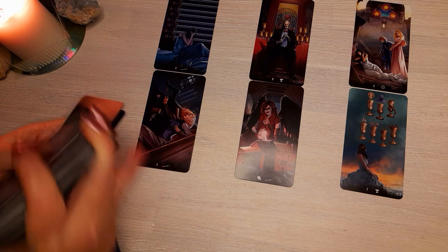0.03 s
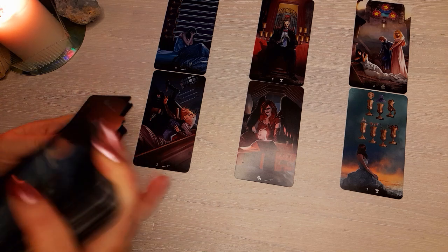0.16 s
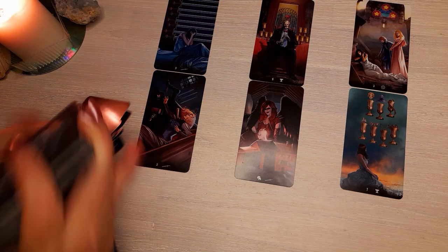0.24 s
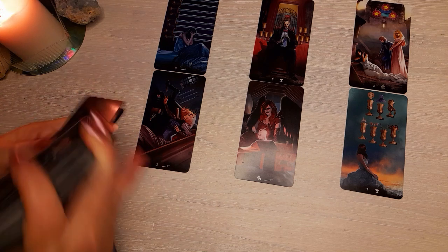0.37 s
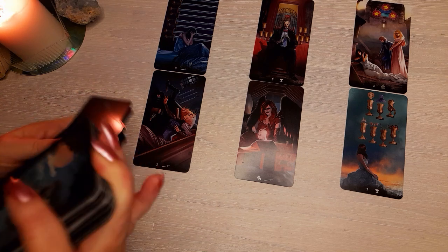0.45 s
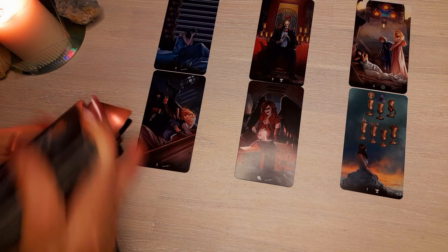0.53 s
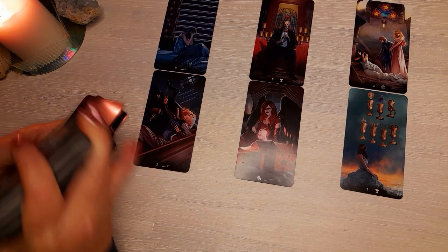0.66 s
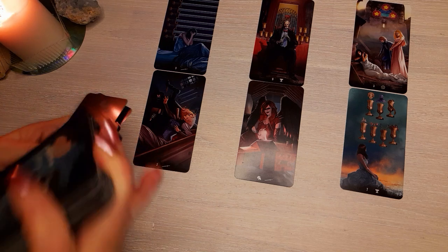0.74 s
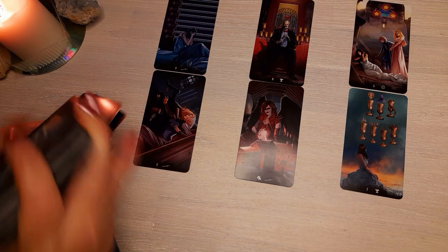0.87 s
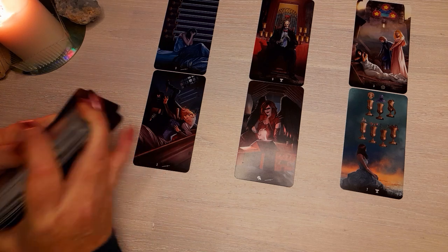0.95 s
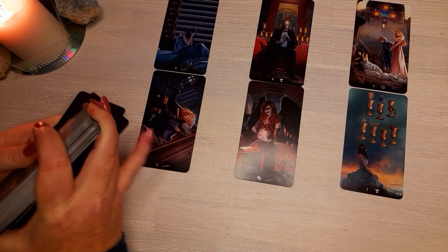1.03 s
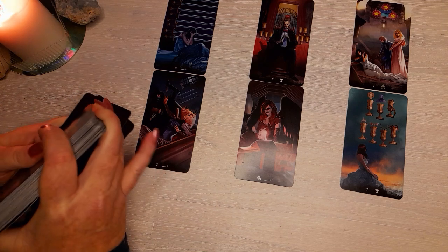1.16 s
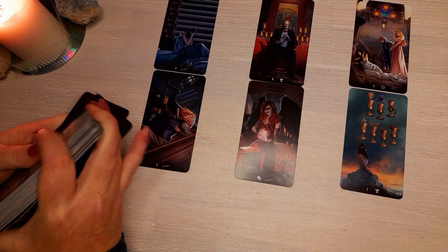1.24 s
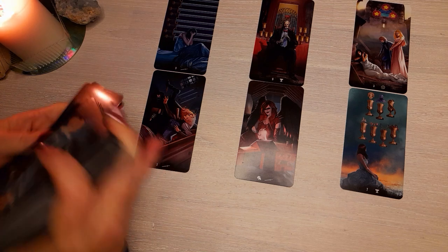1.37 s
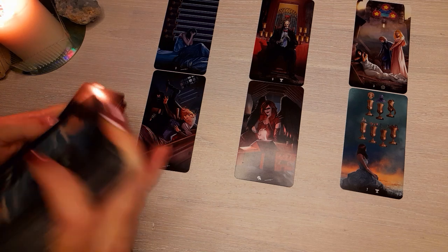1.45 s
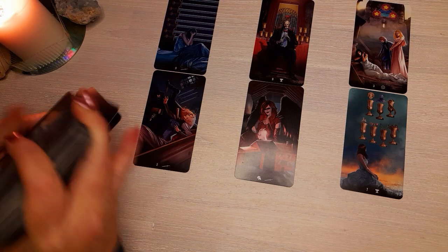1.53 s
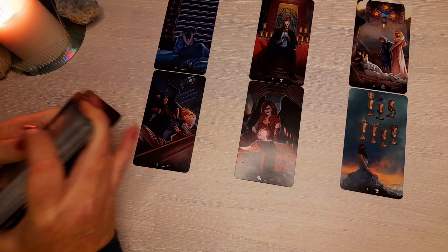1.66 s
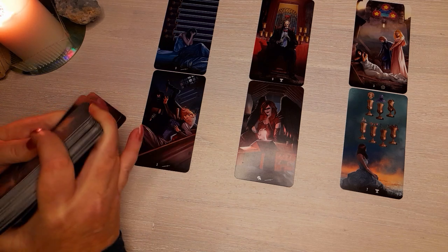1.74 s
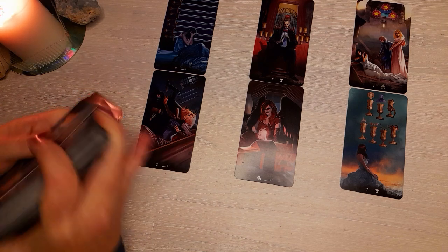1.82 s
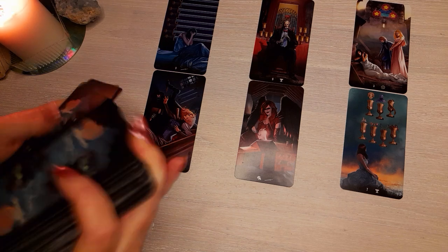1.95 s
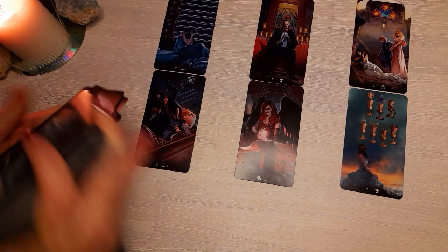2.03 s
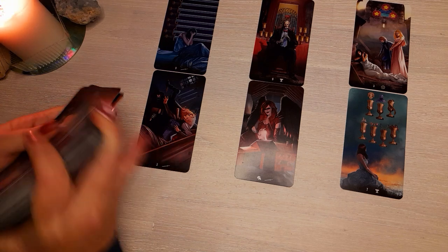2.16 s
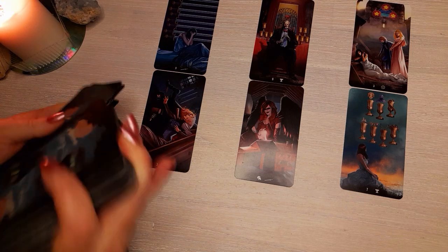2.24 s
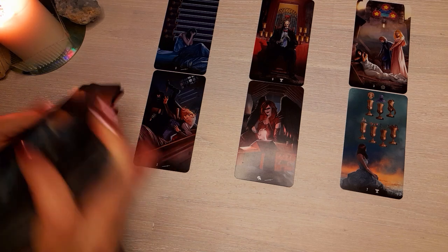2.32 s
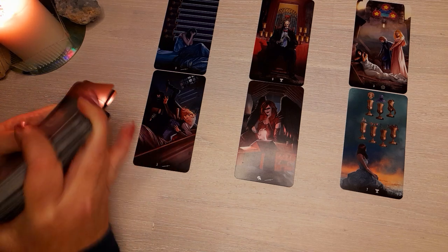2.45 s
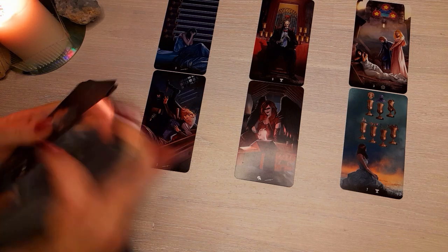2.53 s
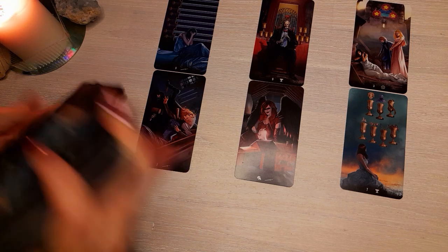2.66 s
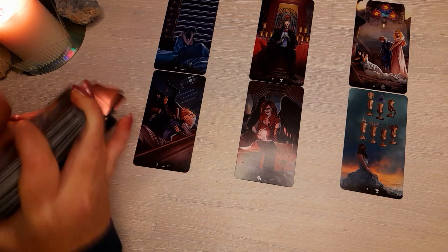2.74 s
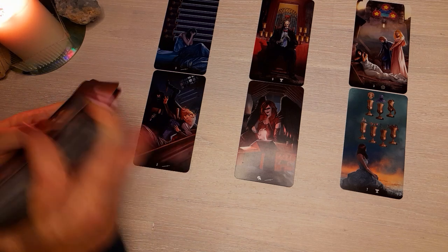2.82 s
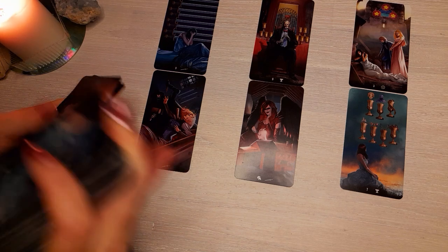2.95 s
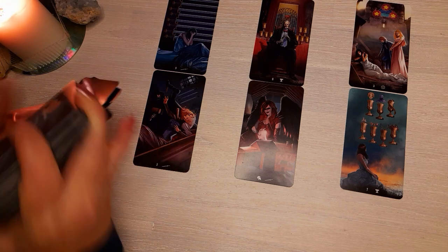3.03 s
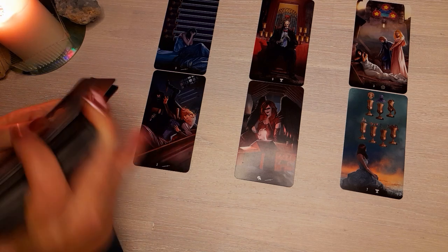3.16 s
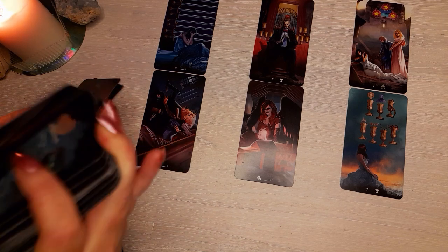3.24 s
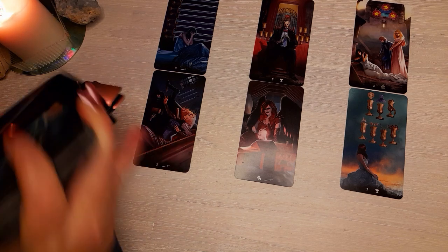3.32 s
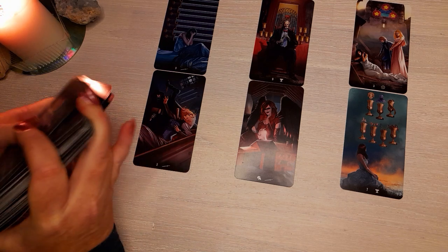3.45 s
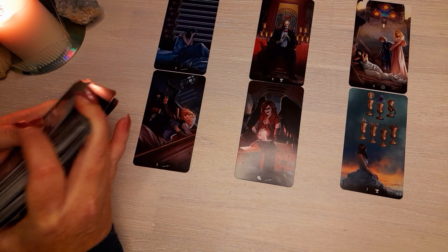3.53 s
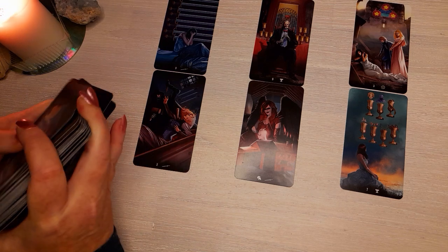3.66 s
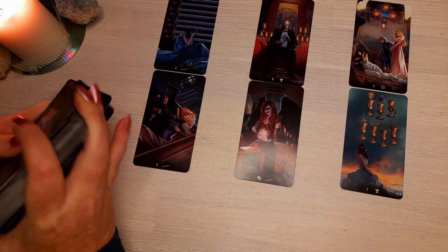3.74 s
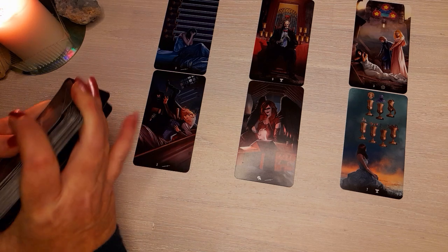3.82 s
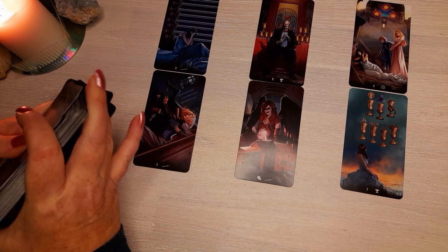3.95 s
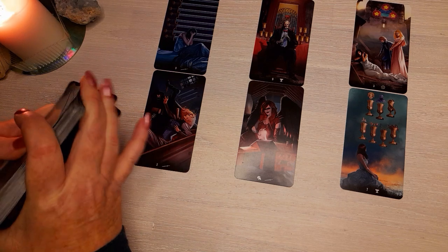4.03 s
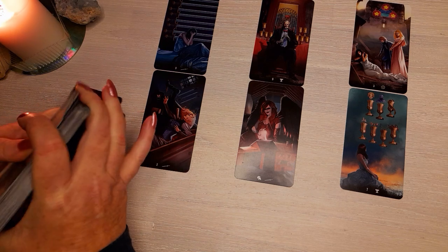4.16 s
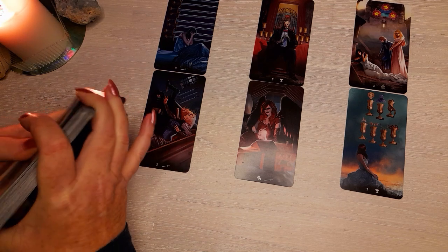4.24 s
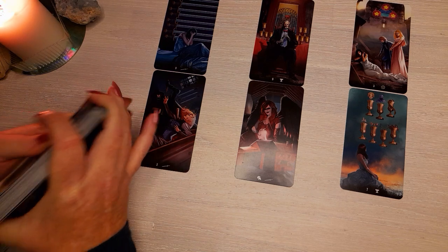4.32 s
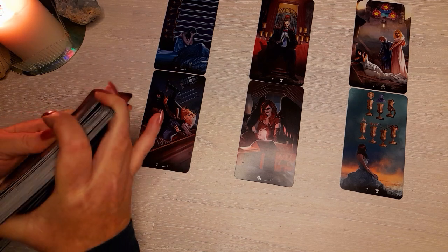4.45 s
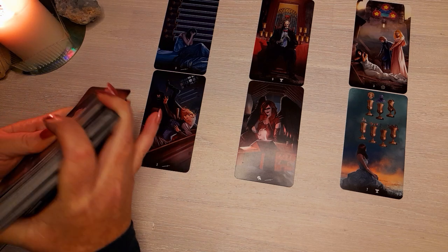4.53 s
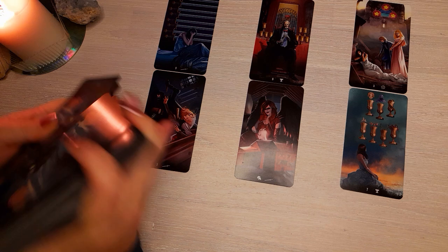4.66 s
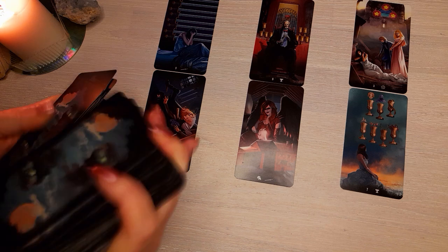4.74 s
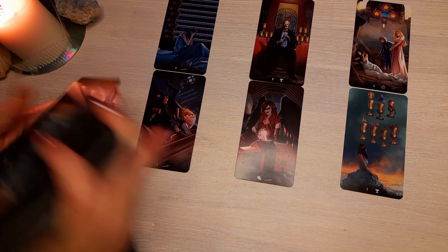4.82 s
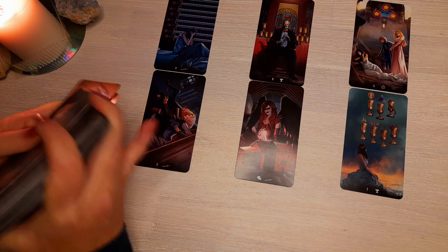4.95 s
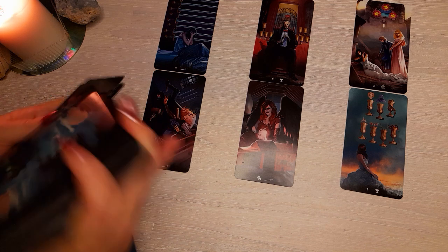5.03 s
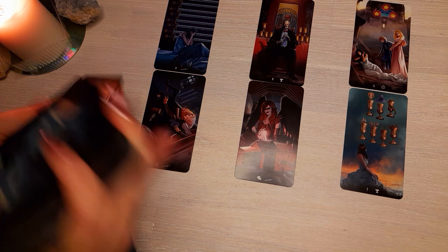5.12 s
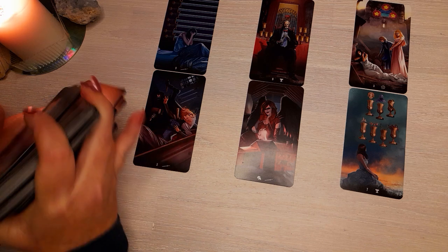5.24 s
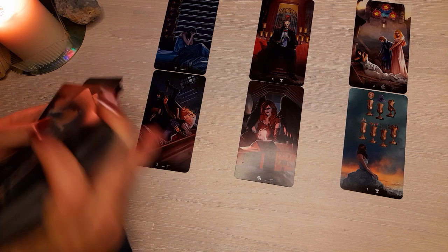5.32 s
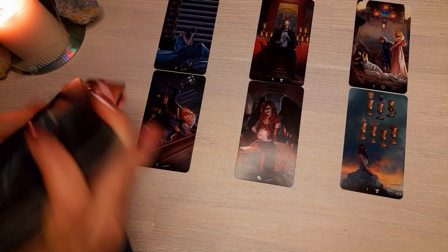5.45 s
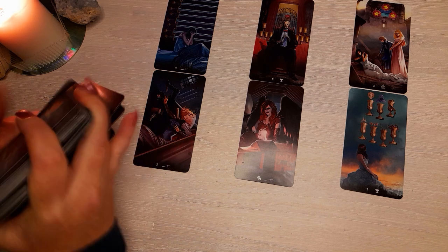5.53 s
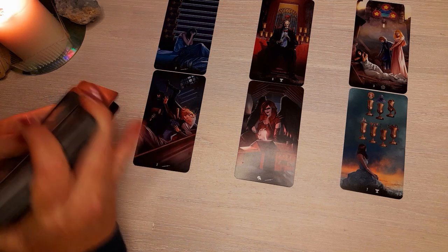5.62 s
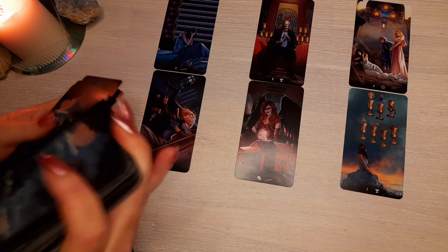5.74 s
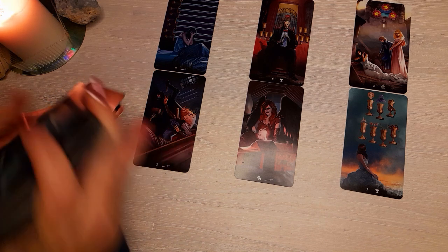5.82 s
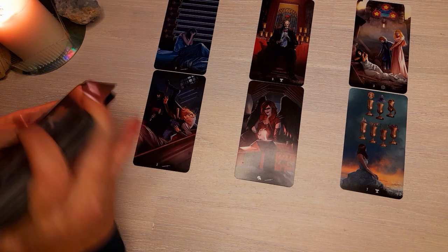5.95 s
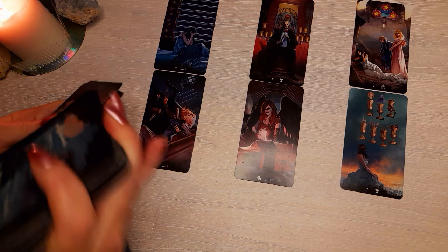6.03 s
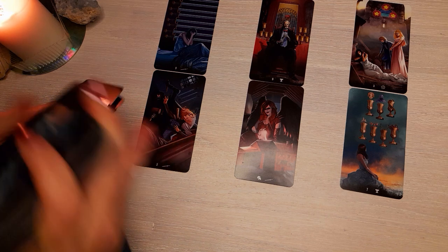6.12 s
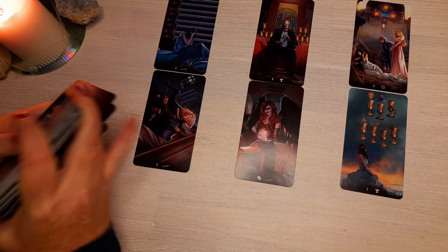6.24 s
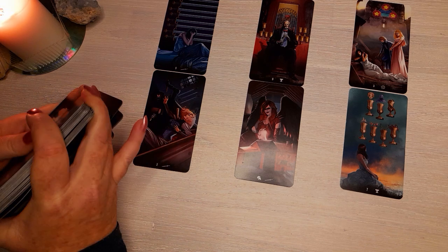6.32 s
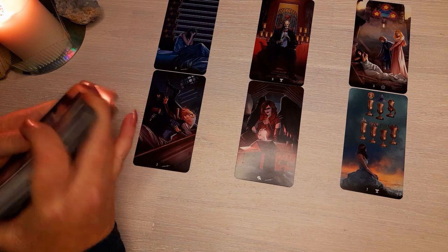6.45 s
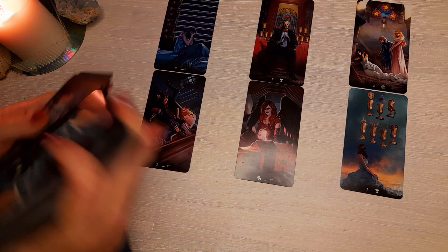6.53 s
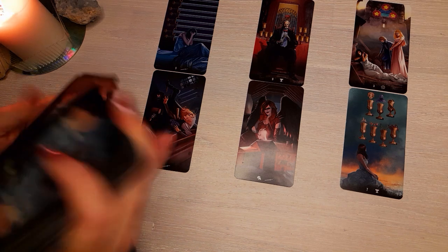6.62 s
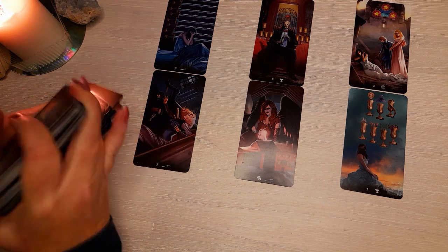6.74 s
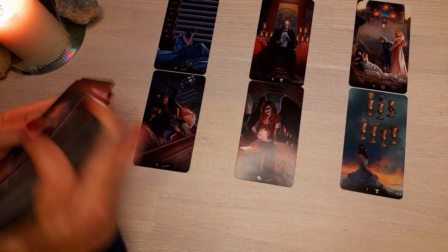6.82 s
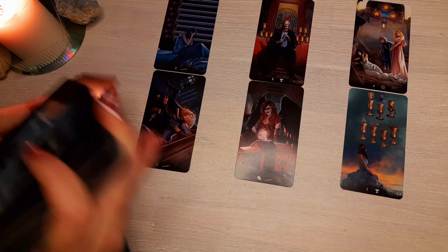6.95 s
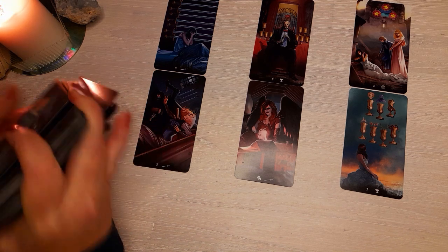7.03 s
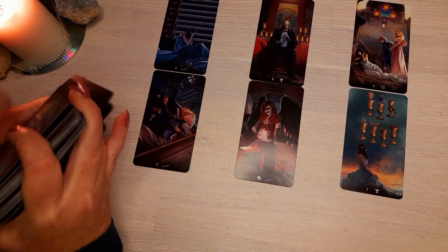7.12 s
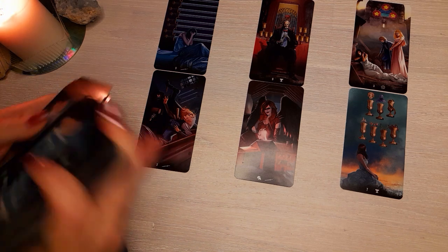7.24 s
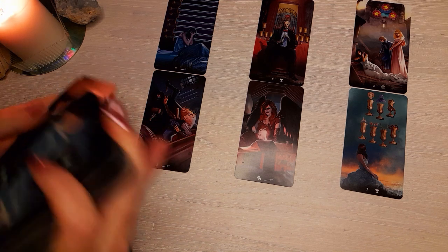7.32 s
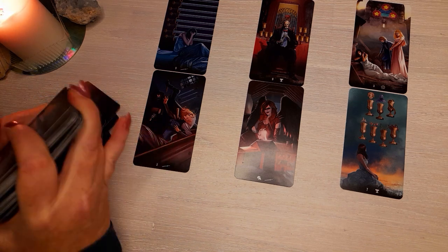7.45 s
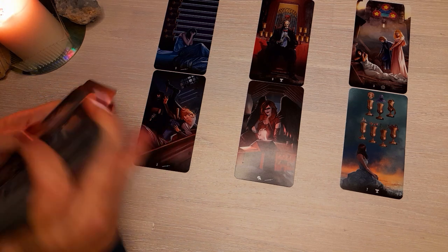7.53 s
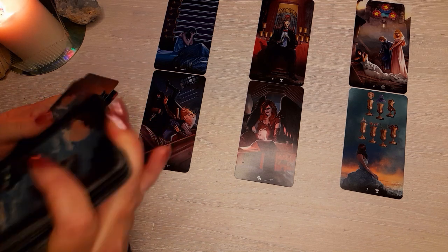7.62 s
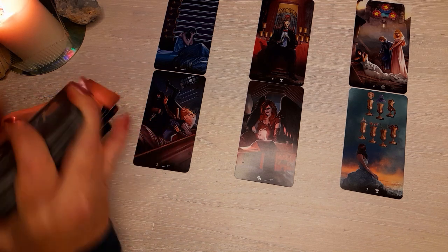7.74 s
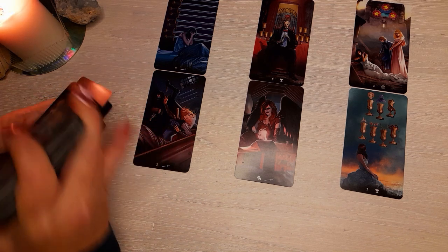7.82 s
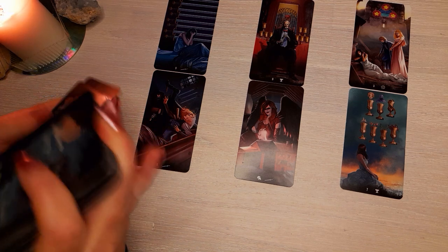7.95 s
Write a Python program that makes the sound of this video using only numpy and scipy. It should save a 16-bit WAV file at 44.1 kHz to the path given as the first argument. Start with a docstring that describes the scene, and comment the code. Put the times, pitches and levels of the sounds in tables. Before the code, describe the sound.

Close, dry shuffling of a deck of large cards in a quiet room: ticks, short bright swishes and woody taps, in runs with pauses.

```python
"""Overhand card shuffle.

Large cards are shuffled close to two microphones, a little to the left, in a quiet room.
In each stroke a packet is picked up with a tick, drags along the deck, slips in with a bright swish
and taps home against the palm. Strokes come about three a second in runs, with idle fingering between.
Rubs and swishes are coloured noise under level curves; ticks, knocks and thuds are short filtered bursts.
Decaying noise gives the room's reflections; a faint steady rush is its air."""
import sys
import numpy as np
from scipy import signal
from scipy.fft import rfft, irfft
from scipy.io import wavfile
from scipy.ndimage import uniform_filter1d

SR = 44100
rng = np.random.default_rng(int(sys.argv[2]) if len(sys.argv) > 2 else 0)


def dump_mix(stems):
    """Bounce the given channels to the path in sys.argv[1] as a 16-bit WAV at rate SR."""
    frames = np.atleast_2d(stems).T  # one column per channel
    limited = np.clip(frames, -1, 1)  # hard clip at full scale
    pcm = np.round(limited * 32767).astype(np.int16)
    wavfile.write(sys.argv[1], SR, pcm)


N = 351918

FILTER_HZ = np.maximum(np.fft.rfftfreq(4096, 1 / SR), 1)
STACK_HZ = 1000  # knock peak of the stack in the usual hold


def cards():
    """What the deck radiates in one direction: rubs, swishes, taps and palm thuds."""
    sliding = rubs(level_db=6.0, attack_s=0.0016, release_s=0.0022, snag_db=0)
    sliding += swishes(level_db=4.5, squareness=5.14)
    landing = taps(tick_db=9.0, crack_db=7.0, knock_db=8.5) + thuds(level_db=-41.0)
    return sliding + landing


# Overhand strokes; levels before each layer's gain: (drag start [s], drag start level [dB],
# mid-slip time [s], slip length [s], swish [dB], rub in the slip [dB], card resonance [Hz],
# landing time [s], edge crack [dB], landing knock [dB])
STROKES = [(0.047, -58.5, .127, 0.019, -23, -39, 2960, .171, -29.5, -31.5),
           (0.364, -59, .434, 0.015, -31.5, -35.5, 1890, .462, -31, -38.5),
           (1.84, -49.5, 1.922, 0.024, -28, -41.5, 2090, 1.95, -27, -34),
           (2.18, -54.5, 2.256, .028, -27, -46.5, 1950, 2.305, -32.5, -41),
           (2.502, -50, 2.583, .019, -24.5, -43.5, 1930, 2.612, -36.5, -45.5),
           (2.848, -52, 2.899, .014, -25.5, -38.5, 1980, 2.9502, -23, -33),
           (3.154, -58, 3.237, .012, -37, -44.5, 1900, 3.314, -56, -42.5),
           (3.337, -41.5, 3.39, 0.042, -46.5, -46, 1470, 3.444, -38, -38.5),
           (4.563, -70, 4.708, .019, -24, -39, 1870, 4.732, -42, -41.5),
           (5.001, -45, 5.067, .017, -26.5, -42.5, 1900, 5.093, -31, -35),
           (5.309, -50.5, 5.375, .025, -23, -40, 1550, 5.4101, -19, -25.5),
           (5.648, -57, 5.722, 0.022, -26, -47, 1715, 5.7497, -37.5, -38),
           (6.472, -64.5, 6.57, 0.026, -32, -39.5, 2023, 6.6083, -31, -33),
           (6.839, -46.5, 6.92, .027, -27, -38.5, 1832, 6.9597, -30, -38),
           (7.199, -48, 7.278, 0.022, -25, -41.5, 1780, 7.3228, -35, -38.5),
           (7.531, -51, 7.594, .014, -26.5, -38.5, 2050, 7.652, -29.5, -33)]
# Packet grips; level before gain: (time [s], length [s], level [dB], card resonance [Hz])
PICKUPS = [(0.022, 0.021, -48, 1230), (.337, 0.016, -45, 1066), (.975, 0.046, -47, 1965),
           (1.316, 0.017, -55, 1000), (1.652, 0.034, -50.5, 1566), (2.131, .016, -44.5, 1730),
           (2.45, 0.03, -50, 1525), (2.796, 0.04, -51.5, 1610), (3.11, .022, -47.5, 1200),
           (4.385, 0.036, -63, 1600), (4.96, 0.026, -53.5, 1480), (5.254, .03, -50, 1550),
           (5.568, 0.053, -48.5, 1400), (5.927, 0.045, -62, 2300), (6.241, 0.061, -60.5, 2200),
           (6.784, .028, -52, 1691), (7.124, 0.0069, -48, 1680), (7.49, 0.017, -52, 1590)]
# Stray cards pushed flush; level before gain:
# (end time [s], length [s], end level [dB], card resonance [Hz])
NUDGES = [(0.657, 0.039, -54, 1200), (.736, 0.011, -46, 2270), (1.406, 0.069, -46.5, 2960),
          (6.006, .012, -46, 2030), (7.899, .04, -54, 2370)]
# Fingertips wandering over the resting deck, before gain: (time [s], level [dB])
FINGERING = [(3.55, -82.5), (3.77, -86), (3.8, -72.5), (3.88, -86.5), (4.04, -90), (4.1, -79.5),
             (4.17, -86), (4.38, -74.5)]
FINGERING_HZ = 2865
SLIP_PRESS_DB, PRESS_S = 7.5, 0.0048  # rub growth just before the packet lets go
BRAKE_DB = 5.5  # rub easing from release to landing
PICKUP_FADE_DB, NUDGE_SWELL_DB = 11.0, 21.0


def rubbing_moves():
    """Each card-on-card move as its level corners (time [s], level [dB]) and card resonance [Hz]."""
    moves = [(FINGERING, FINGERING_HZ)]
    for start, start_db, slip, length, _, db, hz, lands, *_ in STROKES:
        lets_go = slip - length / 2
        corners = [
            (start, start_db),
            (lets_go - PRESS_S, db - SLIP_PRESS_DB),
            (lets_go, db),
            (lands, db - BRAKE_DB),
        ]
        moves.append((sorted(corners), hz))
    for s, length, db, hz in PICKUPS:
        moves.append(([(s, db), (s + length, db - PICKUP_FADE_DB)], hz))
    for s, length, db, hz in NUDGES:
        moves.append(([(s - length, db - NUDGE_SWELL_DB), (s, db)], hz))
    return moves


# Colour of rubbing cards: (frequency [Hz], relative level [dB])
RUB_COLOUR = [(100, 18.5), (600, 10), (1500, -8), (5000, 2), (7500, -2.5), (8800, -1.5), (10200, 1.5),
              (15500, -4.5)]


def rubs(level_db, attack_s, release_s, snag_db):
    """Dragging cards radiate best at their bending resonance, little below it, and snag at random."""
    out = np.zeros(N)
    for corners, hz in rubbing_moves():
        times, db = np.transpose(corners)
        s, length = times[0], times[-1] - times[0]
        t = np.arange(int((length + 10 * release_s) * SR)) / SR
        attack = 1 - np.exp(-t / attack_s)
        release = np.exp(-np.maximum(t - length, 0) / release_s)
        pressure = from_db(level_db + np.interp(s + t, times, db)) * attack * release
        ratio = np.maximum(FILTER_HZ / hz, 0.1)
        resonance = ratio ** 2 / np.hypot(1 - ratio ** 2, 0.42 * ratio)
        card_db = 20 * np.log10(resonance) + grip(spread_db=1.2)
        colour_db = at_hz(RUB_COLOUR, FILTER_HZ) + card_db
        add(out, s, pressure * friction(len(t), colour_db, grain_db=3.0, catch_s=0.0018))
        # an edge catches and springs free, on average 30 times/s
        for i in np.flatnonzero(rng.random(len(t)) < 30 / SR):
            add(out, s + t[i], pressure[i] * from_db(snag_db) * knock(hz))
    return out


# Colour of a sliding packet: (frequency [Hz], relative level [dB])
SWISH_COLOUR = [(330, -23), (520, -14.5), (1100, -22.5), (2200, -23), (4000, -15.5), (7400, -7.5),
                (9000, -8), (10100, -1.5), (15500, -2)]


def swishes(level_db, squareness):
    """A released packet slides in fast: a short bright hiss, loudest at mid-slip."""
    out = np.zeros(N)
    for _, _, mid_s, length, db, *_ in STROKES:
        t = np.arange(int(4 * length * SR)) / SR - 2 * length
        speed = 1 / np.sqrt(1 + np.abs(2 * t / length) ** squareness)
        colour_db = at_hz(SWISH_COLOUR, FILTER_HZ) + grip(spread_db=1.2)
        hiss = friction(len(t), colour_db, grain_db=2.0, catch_s=0.0008)
        add(out, mid_s - 2 * length, from_db(db + level_db) * speed * hiss)
    return out


# Single edges flicking free, before gain: (time [s], level [dB])
TICKS = [(.154, -29), (.392, -42), (1.793, -55.5), (2.207, -35.5), (2.2934, -30), (3.347, -41),
         (3.516, -49.5), (4.989, -43), (5.331, -33), (5.68, -34.5), (5.987, -45.5), (7.126, -48),
         (7.2, -41)]
# Packet bumps on the way, before gain: (time [s], edge crack [dB], knock [dB], knock peak [Hz])
BUMPS = [(.1131, -35, -30, 1700), (.4213, -22.5, -25, 1720), (.429, -23.5, -30.5, 835),
         (.451, -38, -30.5, 1620), (.657, -65, -44.5, 1230), (3.2205, -31, -37.5, 1610),
         (6.2617, -40.5, -44, 2320), (6.919, -33, -35, 1720), (7.587, -26, -25, 596)]
NUDGE_TICK_DB = 6.0  # against the end of the rub
PICKUP_TICK_DB, PICKUP_KNOCK_DB = 0.0, -4.5  # against the start of the rub
# foremost card touches before the landing; levels against the landing
EDGE_LEAD_S, LEADING_EDGE_DB, LEADING_KNOCK_DB = 0.0098, -3.0, -7


def taps(tick_db, crack_db, knock_db):
    """Single edges only tick; a packet also knocks when picked up, bumped or landed."""
    out = np.zeros(N)
    pushed_flush = [(s, db + NUDGE_TICK_DB) for s, _, db, _ in NUDGES]
    for s, db in [*TICKS, *pushed_flush]:
        add(out, s, from_db(db + tick_db) * crack())

    blows = list(BUMPS)
    for s, _, db, _ in PICKUPS:
        blows.append((s, db + PICKUP_TICK_DB, db + PICKUP_KNOCK_DB, STACK_HZ))
    for *_, card_hz, lands, edge_db, stack_db in STROKES:
        leading = edge_db + LEADING_EDGE_DB, stack_db + LEADING_KNOCK_DB
        blows.append((lands - EDGE_LEAD_S, *leading, card_hz))
        blows.append((lands, edge_db, stack_db, STACK_HZ))
    for s, edge_db, stack_db, hz in blows:
        add(out, s, from_db(edge_db + crack_db) * crack())
        add(out, s, from_db(stack_db + knock_db) * knock(hz))
    return out


# Colour of an edge snap: (frequency [Hz], relative level [dB])
CRACK_COLOUR = [(500, -27.5), (2000, -5), (4000, -3.5), (8800, -5.5), (10500, -5.5), (15500, -3)]


def crack():
    """The bright snap of a card's edge."""
    colour_db = at_hz(CRACK_COLOUR, FILTER_HZ) + grip(spread_db=1.4)
    return contact(colour_db, decay_s=0.0011, clatter=2.4)


# Colour of a stack knock: (frequency [Hz], relative level [dB])
KNOCK_COLOUR = [(30, -31), (330, -9), (650, 0), (1200, -2.5), (1700, 1), (2200, -6), (4500, -2.5),
                (12000, -31.5)]


def knock(hz):
    """The dead, woody note of the stack, with a broad peak set by the hold."""
    peak_db = 6 / (1 + (np.log2(FILTER_HZ / hz) / 0.35) ** 2)
    return contact(at_hz(KNOCK_COLOUR, FILTER_HZ) + peak_db, decay_s=0.0017, clatter=1.8)


# Colour of the palm thud: (frequency [Hz], relative level [dB])
THUD_COLOUR = [(25, -31), (60, -8), (150, -1), (400, -7), (2500, -35)]
THUD_FOLLOWS = 0.45  # thud swing per landing-knock swing [dB/dB]


def thuds(level_db):
    """The soft palm takes the weight of each landing packet."""
    out = np.zeros(N)
    mean_db = np.mean([row[-1] for row in STROKES])
    for *_, lands, _, db in STROKES:
        gain = from_db(level_db + THUD_FOLLOWS * (db - mean_db))
        add(out, lands, gain * contact(at_hz(THUD_COLOUR, FILTER_HZ), decay_s=0.014, clatter=1.9))
    return out


def friction(count, colour_db, grain_db, catch_s):
    """Countless tiny surface slips, bunched where edges catch; rms 1."""
    window = max(2, int(catch_s * SR))
    catches = rms_one(uniform_filter1d(rng.standard_normal(count), window))
    bunching = from_db(grain_db * np.clip(catches, -2.5, 2.5))
    slips = rng.standard_normal(count) * bunching
    return rms_one(signal.fftconvolve(slips, response(colour_db))[:count])


def contact(colour_db, decay_s, clatter):
    """One sharp touch plus the clatter of neighbouring cards; energy of 1 ms at rms 1."""
    t = np.arange(2048) / SR
    rattle = rms_one(rng.standard_normal(len(t)) * np.exp(-t / decay_s))
    hits = clatter * rattle / np.sqrt(len(t))
    hits[0] += 1
    sound = signal.fftconvolve(hits, response(colour_db))
    return sound * np.sqrt(SR / 1000 / np.sum(sound ** 2))


def grip(spread_db):
    """Each hold of the deck reflects differently: random spectral peaks and dips [dB]."""
    knots_hz = np.geomspace(300, 16000, 28)
    return spread_db * np.interp(FILTER_HZ, knots_hz, rng.standard_normal(len(knots_hz)))


# Far (right) microphone against the near one: (frequency [Hz], level [dB])
FAR_SIDE = [(60, -6.5), (250, -5.5), (1000, -6), (4000, -10.5), (7400, -9), (8800, -1), (10200, -12.5)]
FAR_LAG_S = 0.00016


def microphones(near, aside, shared):
    """The left is close; the right hears the deck later, softer and partly from another side."""
    far = colour(shared * near + np.sqrt(1 - shared ** 2) * aside, FAR_SIDE)
    far = np.interp(np.arange(N) - FAR_LAG_S * SR, np.arange(N), far)
    echoes = [signal.fftconvolve(near, echo)[:N] for echo in reflections(wall_s=0.0013)]
    return np.array([near, far]) + echoes


# Room response against the direct near sound: (frequency [Hz], level [dB])
ROOM_COLOUR = [(60, -13), (200, -1.5), (1000, -10.5), (3500, -10.5), (6000, -12.5), (15500, -17)]
# Reverberation time, 60 dB decay: (frequency [Hz], time [s])
ROOM_T60 = [(100, .6), (500, 0.36), (5000, 0.32), (16000, 0.23)]


def reflections(wall_s):
    """The walls' answer at both microphones builds up quickly and dies sooner in the treble."""
    t = np.arange(int(0.7 * SR)) / SR
    white = rfft(stereo_noise(len(t)))
    tail = np.zeros((2, len(t)))
    centres_hz = np.geomspace(60, 16000, 9)
    log_bins = np.log(np.maximum(np.fft.rfftfreq(len(t), 1 / SR), 1))
    build_up = 1 - np.exp(-(t / wall_s) ** 2)
    for hz, share in zip(centres_hz, np.eye(len(centres_hz))):
        fade = np.exp(-np.log(1000) * t / at_hz(ROOM_T60, hz)) * build_up
        band = irfft(white * np.interp(log_bins, np.log(centres_hz), share), len(t))
        tail += band * fade / np.sqrt(2 * np.sum(fade ** 2))
    return [colour(side, ROOM_COLOUR) for side in tail]


# Colour of still air: (frequency [Hz], relative level [dB])
AIR_COLOUR = [(25, -32), (80, -10), (170, -6.5), (380, -15.5), (520, -11), (750, -25.5), (1000, -19),
              (1250, -35), (5500, -39.5), (7300, -38), (8400, -42.5), (15500, -39.5)]
AIR_MID_DB = -68.5  # midway between the channel gains


def air(lean_db):
    """A faint steady rush in the room, leaning left."""
    rush = rms_one(np.array([colour(side, AIR_COLOUR) for side in stereo_noise(N)]))
    return rush * from_db([[AIR_MID_DB + lean_db], [AIR_MID_DB - lean_db]])


# Likeness of diffuse sound at the two microphones: (frequency [Hz], correlation [-1..1])
LIKENESS = [(500, 0.778), (1200, 0.06), (2500, 0.14)]


def stereo_noise(count):
    """Diffuse noise at two microphones: alike in the bass, nearly unrelated in the treble."""
    alike = at_hz(LIKENESS, np.maximum(np.fft.rfftfreq(count, 1 / SR), 1))
    mid = irfft(rfft(rng.standard_normal(count)) * np.sqrt(1 + alike), count)
    side = irfft(rfft(rng.standard_normal(count)) * np.sqrt(1 - alike), count)
    return np.array([mid + side, mid - side])


def from_db(db):
    """Decibels to gain."""
    return 10 ** (np.asarray(db) / 20)


def rms_one(x):
    """Scale to an rms of 1."""
    return x / np.sqrt(np.mean(x ** 2) + 1e-20)


def at_hz(points, hz):
    """Read a table on a log-frequency axis."""
    f, value = np.transpose(points)
    return np.interp(np.log(hz), np.log(f), value)


def response(db):
    """Causal minimum-phase impulse response with the given gains on FILTER_HZ."""
    cepstrum = irfft(np.log(from_db(db)))
    half = len(cepstrum) // 2
    cepstrum[1:half] *= 2  # fold onto positive time
    cepstrum[half + 1:] = 0
    return irfft(np.exp(rfft(cepstrum)))


def colour(x, spectrum):
    """Filter by a table of (frequency [Hz], level [dB])."""
    return signal.oaconvolve(x, response(at_hz(spectrum, FILTER_HZ)))[:len(x)]


def add(track, s, sound):
    """Mix a sound into a track from time s [s]."""
    start = int(np.clip(round(s * SR), 0, N))
    track[start:start + len(sound)] += sound[:N - start]


def scene():
    """The deck at the two microphones, in the quiet room."""
    deck = microphones(near=cards(), aside=cards(), shared=0.66)
    return deck + air(lean_db=1.7)


def record(dry):
    """Steep low-pass at 15.9 kHz."""
    low_pass = signal.ellip(12, 0.1, 80, 15900, fs=SR, output="sos")
    return signal.sosfilt(low_pass, dry)


dry = scene()
out = record(dry)
dump_mix(out)
```